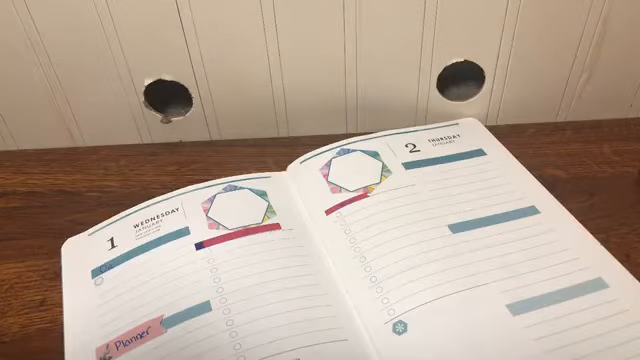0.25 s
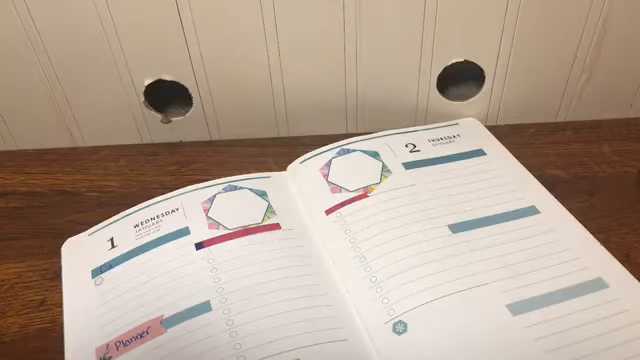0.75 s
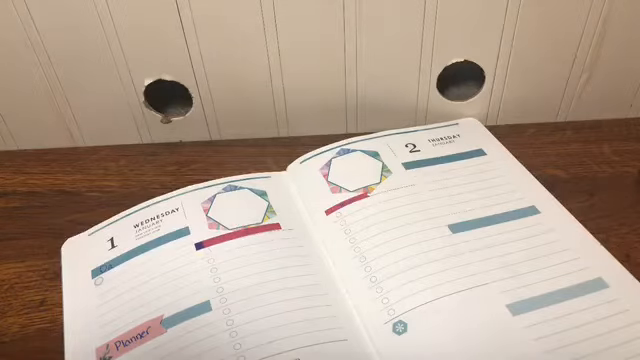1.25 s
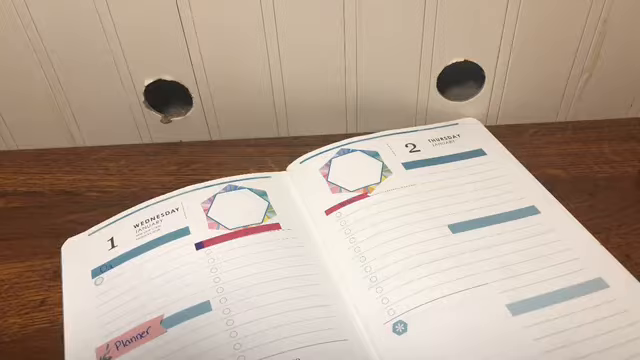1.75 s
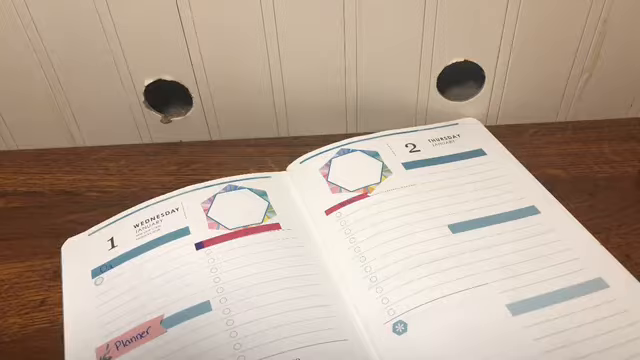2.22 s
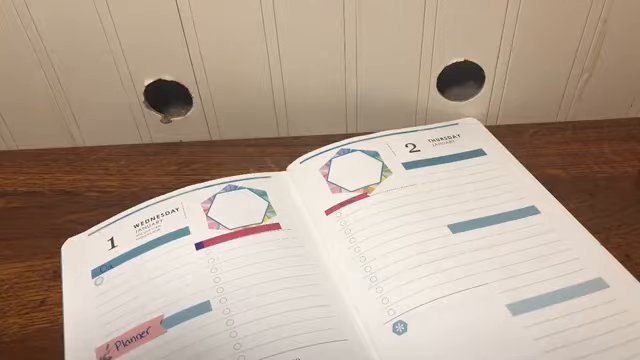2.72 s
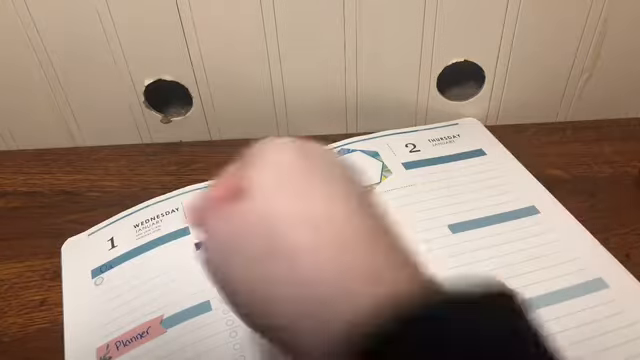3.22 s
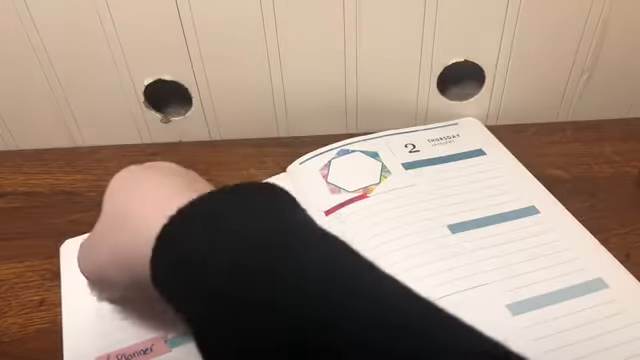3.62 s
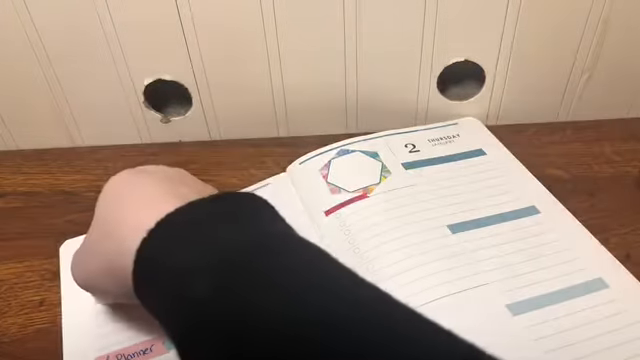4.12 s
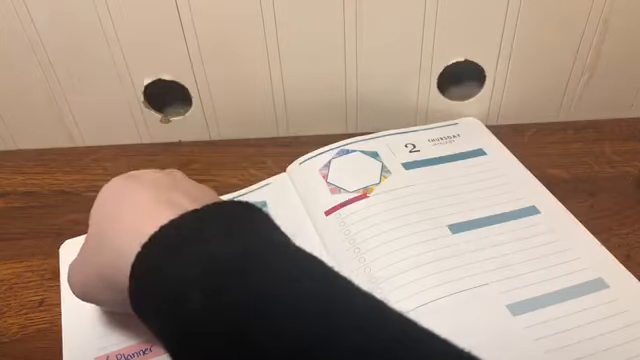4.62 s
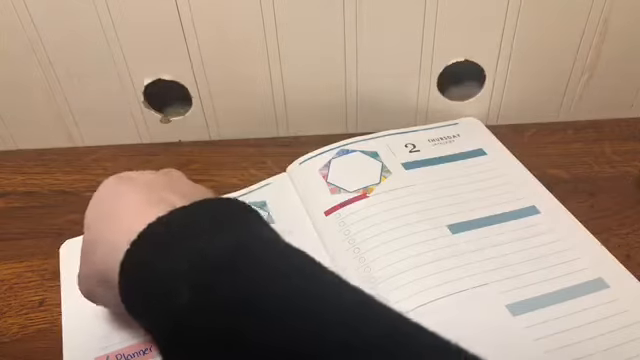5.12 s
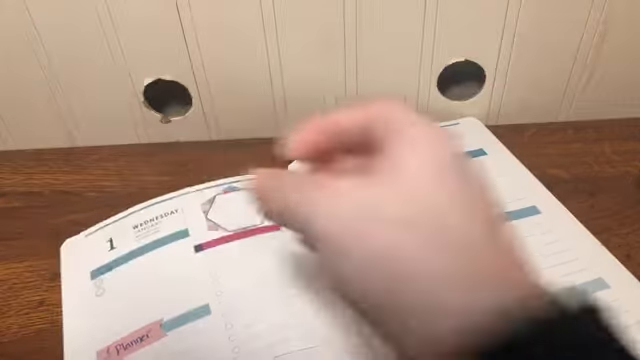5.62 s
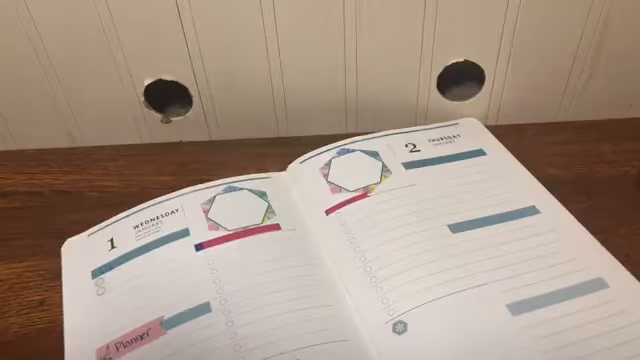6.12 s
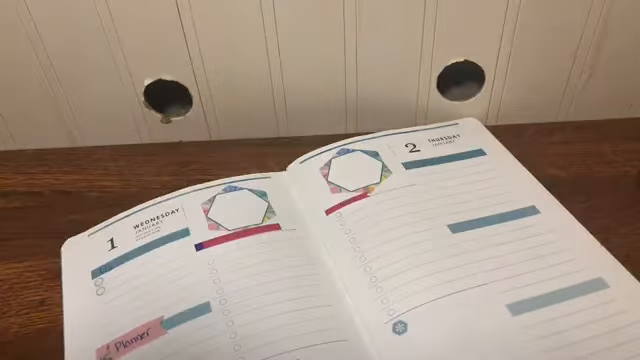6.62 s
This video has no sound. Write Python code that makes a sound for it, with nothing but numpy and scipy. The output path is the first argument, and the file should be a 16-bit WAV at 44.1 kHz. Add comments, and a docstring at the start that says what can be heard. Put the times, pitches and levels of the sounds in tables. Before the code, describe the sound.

Light nail and paper-edge ticks open over low electrical and motor hum. The stiff backing sheet pops sharply, ticks on, then pops again more softly. A soft hand lands on the book with a woody thump, smooths a sticker with a faint rub, thumps once more and drags away. Afterwards come a soft low rumble, fine rustling, faint high peeling squeaks and a crisp tap, all close and dry with a short room tail.

```python
"""A sticker is picked off its stiff backing sheet with ticks and two snaps, close up in a small humming room.
A hand bumps the wooden desk, strokes a planner page, smooths the sticker down and drags away; the next one squeaks.
Ticks, snaps and taps are noise bursts through resonances, strokes are grainy noise, bumps are decaying sines.
Under it lie a motor and steady tones made of sines, and the noise of the room air."""
import sys
import numpy as np
from scipy import signal
from scipy.fft import rfft, irfft, next_fast_len
from scipy.io import wavfile
from scipy.ndimage import uniform_filter1d, map_coordinates

SR = 44100
rng = np.random.default_rng(int(sys.argv[2]) if len(sys.argv) > 2 else 0)


def bounce(signal):
    """Save signal as a 16-bit WAV file at the path given by the first command-line argument."""
    frames = np.transpose(np.atleast_2d(signal))
    limited = np.clip(frames, -1, 1)
    pcm = np.round(limited * 32767).astype(np.int16)
    wavfile.write(sys.argv[1], SR, pcm)


N = 302526

# resonances of the bent backing sheet: f/Hz, width/Hz, relative lift/dB (scaled where used)
SHEET_MODES = [(1008, 64, 13), (1840, 75, 17), (2890, 185, -1.5), (3300, 110, -13), (4110, 330, 8.5),
               (5250, 130, 14), (5770, 210, 1), (7160, 100, 8.5), (9100, 230, 10.5)]


def amp(db):
    """Decibels to gain."""
    return 10 ** (np.asarray(db) / 20)


def unit(x):
    """Scale to rms 1."""
    return x / np.sqrt(np.mean(x ** 2) + 1e-20)


def along(points, hz):
    """Read (f/Hz, value) points on a log frequency axis."""
    f, v = np.transpose(points)
    return np.interp(np.log(hz + 1), np.log(f), v)


def wobble(rate):
    """A smooth random curve with rate knots a second."""
    knots = rng.standard_normal(int(N * rate / SR) + 4)
    return map_coordinates(knots, [np.arange(N) * rate / SR])


def filtered(x, response):
    """Filter x by a response given as a function of frequency."""
    m = next_fast_len(N + SR // 2)
    return irfft(rfft(x, m) * response(np.fft.rfftfreq(m, 1 / SR)), m)[:N]


def coloured(x, points):
    """Shape x by an EQ curve of (f/Hz, level/dB) points, then scale to rms 1."""
    return unit(filtered(x, lambda hz: amp(along(points, hz))))


def causal(curve, size=4096):
    """Minimum-phase impulse response of energy 1 for a dB curve of frequency."""
    cepstrum = irfft(np.log(amp(curve(np.fft.rfftfreq(size, 1 / SR)))))
    cepstrum[1:size // 2] *= 2
    cepstrum[size // 2 + 1:] = 0
    h = irfft(np.exp(rfft(cepstrum)))
    return h / np.linalg.norm(h)


def fade(t, t60):
    """Exponential decay that loses 60 dB in t60 seconds."""
    return np.exp(-np.log(1000) * t / max(t60, 1e-3))


def burst(t60, attack):
    """A crackle of noise that rises quickly and dies away, with the energy of its envelope."""
    t = np.arange(SR // 5) / SR
    shape = fade(t, t60) * (1 - np.exp(-t / attack))
    x = shape * rng.standard_normal(len(t))
    return x * np.linalg.norm(shape) / np.linalg.norm(x)


def add(track, s, sound):
    """Mix a sound in at time s."""
    i = max(round(s * SR), 0)
    track[i:i + len(sound)] += sound[:max(N - i, 0)]


def friction(rate, spread_db, smooth):
    """Paper fibres catch and let go: rate grains a second of uneven size over an even hiss."""
    hits = rng.random(N) < rate / SR
    grains = hits * rng.standard_normal(N) * amp(spread_db * rng.standard_normal(N))
    return unit(unit(grains) + smooth * rng.standard_normal(N))


def patchy(x, depth_db):
    """The contact patch keeps changing shape, so bands of the sound come and go."""
    z = signal.stft(x, nperseg=512)[2]
    field = rng.standard_normal(z.shape)
    for _ in range(2):
        across_bands = uniform_filter1d(field, size=4, axis=0)
        field = uniform_filter1d(across_bands, size=9, axis=1)
    return signal.istft(z * amp(depth_db * unit(field)), nperseg=512)[1][:N]


def stroke(start, length, attack=.025, release=.061, sag_db=8):
    """Pressure of one stroke (times in s): it builds, sags by sag_db a second, and lifts around its end."""
    t = np.arange(N) / SR - start
    build = np.clip(t / attack, 0, 1)
    lift = np.clip((length - t) / release + .5, 0, 1)
    return build * lift * amp(-sag_db * np.clip(t, 0, length))


def sheet_db(hz, modes):
    """The lift that the sheet's resonances give each frequency, at 0.63 of their listed size."""
    lift = sum(db / (1 + (2 * (hz - centre) / width) ** 2) for centre, width, db in modes)
    return 0.63 * lift


def hum():
    """A motor with a strong third order, mains hum with faint tones, and the air of the room."""
    # sines locked to the motor's turning: order, rms level/dB
    motor_orders = [(1, -71), (2, -64.5), (3, -52.5), (6, -83)]
    # mains hum and faint tones: f/Hz, mean rms level/dB
    faint_tones = [(120, -69.5), (171, -79), (188, -75.5), (531, -83), (565, -84.5)]
    # EQ of the room air: f/Hz, relative level/dB
    air_colour = [(20, -51), (32, -18.5), (48, 4), (62, 6.5), (85, -2), (140, 0.5), (240, -3), (300, -12),
                  (600, -14), (1000, -19.5), (2000, -25.5), (4000, -31), (9000, -36.5), (16000, -41.5)]
    motor_hz = 51.32  # mean speed
    t = np.arange(N) / SR
    turns = np.cumsum(motor_hz * (1 + .001 * wobble(2))) / SR
    load = amp(.6 * wobble(1.5))
    motor = load * sum(amp(db) * np.sin(2 * np.pi * (order * turns + rng.random()))
                       for order, db in motor_orders)
    tones = sum(amp(db + 1.3 * wobble(3.8)) * np.sin(2 * np.pi * (hz * t + rng.random()))
                for hz, db in faint_tones)
    air = amp(-59.5) * coloured(rng.standard_normal(N), air_colour)
    return np.sqrt(2) * (motor + tones) + air  # sqrt 2 turns sine peaks into rms levels


def ticks():
    """Nails and paper edges tick, soft ones with body, sharp ones with edge; the grip shifts the sheet's modes."""
    # tick moments: t/s, relative level/dB, relative body/dB, relative edge/dB
    contacts = [(.0024, -40.5, 6, -24), (0.0123, -52.5, -13, -29), (.0538, -40.5, 0, -19.5),
                (0.0733, -45.5, 11, -22), (0.0896, -46.5, 4.5, -31), (.176, -41, 2, -17.5),
                (.1854, -42.5, 14, -24), (0.203, -52, -14, -18), (0.2149, -34.5, -4.5, -21.5),
                (.297, -45.5, 1, -23), (0.3241, -48.5, 2, -24), (0.3358, -52.5, -16, -23),
                (.415, -47.5, -3, -11), (0.4325, -53, -5, -20), (1.0514, -43, 3, -22),
                (1.0697, -48, 1, -22), (1.1566, -36, -1, -6), (1.2372, -39, 2.5, -24),
                (1.2486, -49, 3, -15), (1.344, -47.5, 12, -24), (1.4416, -56, -15, -17),
                (1.4905, -36.5, -3, -70), (1.5024, -57, -9, -20), (1.649, -57, 2, -22),
                (1.6891, -50.5, -7, -48), (1.724, -56, 8, -20), (1.7524, -53, 5, -36),
                (2.339, -50, -9, -16), (2.4239, -49, -2.5, -17), (2.51, -47.5, -18, -1),
                (2.524, -38, -1, -14), (3.0505, -42.5, -5, -30), (3.072, -48, -15, -12),
                (3.3444, -40, -2.5, -15), (3.6396, -51, -25, -15.5), (3.66, -55, -15, -15),
                (4.3836, -62, -11, -1), (5.018, -49, 3, -37), (5.0853, -46.5, 5, -9),
                (5.1834, -52.5, 4, -16), (5.5758, -47, -9, -20), (5.584, -46, -7, -27),
                (5.6805, -47.5, -4, -21), (6.1788, -43.5, -1, -7), (6.191, -45.5, -1, -3),
                (6.2297, -44.5, 5, -3), (6.2966, -47.5, -0.5, -11), (6.467, -48, 4, -29),
                (6.555, -51, 11, -22), (6.636, -53.5, 4, -18), (6.688, -55, -1, -26)]
    t60_s, attack_s = .036, .0013
    out = np.zeros(N)
    for s, db, body_db, edge_db in contacts:
        bend = np.exp(0.136 * rng.standard_normal())
        colour = [(150, body_db - 15.0), (450, body_db + 7.5), (900, body_db + 8.5),
                  (1800, 0.2), (3200, -1.0),
                  (5500, 0.56 * edge_db + 0.5), (10000, edge_db - 1.5), (16000, 1.25 * edge_db - 6)]
        ring = causal(lambda hz: along(colour, hz) + sheet_db(hz * bend, SHEET_MODES))
        tick = signal.fftconvolve(burst(t60_s, attack_s), ring)
        add(out, s - .0005, amp(db - 1) * tick)
    return out


def room(x, wall_db, tail_db):
    """What the room sends back: near wall and desk almost at once, then a short tail."""
    # decay of the tail: f/Hz, t60/s
    tail_t60 = [(200, 0.39), (1000, 0.2), (4000, 0.25), (9000, 0.15), (16000, 0.063)]
    hz, t, z = signal.stft(rng.standard_normal(SR // 2), SR, nperseg=256)
    decay = np.exp(-np.log(1000) * t / along(tail_t60, hz)[:, None])
    tail = signal.istft(z * decay, SR, nperseg=256)[1]
    walls = burst(0.014, attack=0.00084)
    answer = np.zeros(N)
    add(answer, .003, amp(wall_db) * walls / np.linalg.norm(walls))
    add(answer, .008, amp(tail_db) * tail / np.linalg.norm(tail))
    return signal.fftconvolve(x, answer[:SR // 2])[:N]


def rustles(flutter_db):
    """Fingers and sleeve rub on paper: a papery body and a fine hiss follow the same strokes."""
    # strokes over sheet and page: start/s, length/s, rustle level/dB, hiss level/dB
    rubs = [(.17, .09, -73, -88), (0.304, .1, -67.5, -83), (1.147, 0.13, -58, -74),
            (1.338, .15, -60, -70.5), (1.585, 0.19, -75, -92), (2.29, 0.25, -70, -74.5),
            (2.568, 0.048, -63, -66), (3.069, 0.084, -64, -64.5), (3.335, 0.13, -57.5, -58),
            (3.458, 0.098, -64, -64), (5.176, 0.093, -67.5, -77), (5.278, 0.083, -69, -69),
            (5.357, 0.16, -66, -67), (5.53, 0.266, -69, -70.5), (6.168, 0.079, -70, -61.5),
            (6.242, .075, -79, -66.5), (6.324, 0.1, -70.5, -70), (6.429, 0.075, -59.5, -71),
            (6.512, 0.24, -69, -75)]
    # EQ of the papery body: f/Hz, relative level/dB
    body_colour = [(200, -4), (450, 6.5), (750, 10.5), (1100, 7.5), (1550, 6), (2300, 0), (3500, -14),
                   (6000, -35)]
    # EQ of the fine hiss: f/Hz, relative level/dB
    hiss_colour = [(1800, -2), (3500, 4.5), (5500, 0.5), (8000, -4), (12000, -9), (16000, -10)]
    body_gain, hiss_gain = np.zeros(N), np.zeros(N)
    for s, length, rustle_db, hiss_db in rubs:
        pressure = stroke(s, length)
        body_gain += amp(rustle_db) * pressure
        hiss_gain += amp(hiss_db) * pressure
    body = coloured(patchy(friction(650, spread_db=3, smooth=.4), depth_db=2.7), body_colour)
    hiss = coloured(patchy(friction(2200, spread_db=2, smooth=.9), depth_db=2.2), hiss_colour)
    flutter = amp(flutter_db * wobble(70))
    return (body_gain * body + hiss_gain * hiss) * flutter


def snaps():
    """The stiff sheet flips over in a few quick buckles, each ringing the resonances of its present bend."""
    # buckling steps, one list a snap: t/s, relative level/dB, t60/s
    buckles = [
        [(0.7086, -23.5, 0.018), (0.7103, -19, 0.0097), (.7125, -34.5, 0.041)],
        [(2.0463, -30, 0.012), (2.0484, -28, 0.0088), (2.0499, -29, 0.023)],
    ]
    # EQ of the crack: f/Hz, relative level/dB
    crack_colour = [(100, -18), (250, -11), (600, -9), (1100, -7.5), (1700, -12), (2300, -14.5),
                    (3000, -3.5), (4500, -11.5), (5600, -5), (6500, -11.5), (10000, -11), (12500, -19.5),
                    (16000, -17.5)]
    # the same sheet, bent further, for the second snap: f/Hz, width/Hz, relative lift/dB
    flexed_modes = [(754, 68, 12.5), (1004, 140, 13), (1500, 410, 10), (3260, 120, -3), (4150, 250, 21.5),
                    (5200, 260, 12), (5700, 190, 14), (7500, 150, 9), (9500, 150, 3), (15000, 2000, 10)]
    direct, spread = np.zeros(N), np.zeros(N)
    broad = causal(lambda hz: along(crack_colour, hz))
    for steps, modes in zip(buckles, (SHEET_MODES, flexed_modes)):
        ring = causal(lambda hz: along(crack_colour, hz) + sheet_db(hz, modes))
        for s, db, t60 in steps:
            crack = amp(db + 2.0) * burst(t60, attack=.0001)
            add(direct, s, signal.fftconvolve(crack, ring))
            add(spread, s, signal.fftconvolve(crack, broad))  # over all directions the peaks even out
    return direct + room(spread, wall_db=-21, tail_db=-18.0)


def taps():
    """Damped taps and clicks: one broad resonance that falls off steeply above."""
    # tap moments: t/s, relative level/dB, f/Hz, t60/s
    pats = [(3.052, -37, 684, 0.028), (3.055, -46, 1270, 0.019), (3.0557, -36, 382, 0.033),
            (3.389, -49.5, 470, 0.044), (5.0773, -36, 734, 0.028), (5.0778, -44, 1400, 0.015),
            (5.0856, -48, 14500, 0.022), (6.84, -41, 1940, 0.0085), (6.8418, -33.5, 1860, 0.039)]
    out = np.zeros(N)
    for s, db, pitch_hz, t60 in pats:
        shape = [(pitch_hz / 8, -22), (pitch_hz * .4, -8), (pitch_hz * .68, -9),
                 (pitch_hz * .9, 0), (pitch_hz * 1.15, 0),
                 (pitch_hz * 1.5, -12), (pitch_hz * 2.6, -25), (pitch_hz * 6, -46)]
        ring = causal(lambda hz: along(shape, hz))
        tap = signal.fftconvolve(burst(t60, attack=0.00057), ring)
        add(out, s, amp(db + 1.5) * tap)
    return out


def thumps():
    """A soft hand lands on the planner and pushes the desk top down; its modes ring on."""
    # blows: t/s, relative level/dB, upper-mode trim/dB
    blows = [(3.056, -29, -1.5), (5.0815, -32, -11.5)]
    # modes of the desk under the planner: f/Hz, relative level/dB, t60/s
    desk_modes = [(101, -17, 0.04), (148.6, 2, 0.14), (239.2, 2.5, 0.11), (360, -1.5, 0.075),
                  (403, 0, 0.065), (569, -15, 0.018), (615, -20.5, 0.1), (754, -10.5, 0.097),
                  (936, -23, 0.066), (1340, -31, 0.064)]
    out, t = np.zeros(N), np.arange(SR // 3) / SR
    soft_attack = 1 - np.exp(-t / 0.0031)
    for s, db, upper_db in blows:
        ring = np.zeros(len(t))
        for hz, level, t60 in desk_modes:
            gain = amp(level + upper_db * (hz > 200))
            ring += gain * fade(t, t60) * np.sin(2 * np.pi * hz * t)
        add(out, s, -amp(db + 2.5) * ring * soft_attack)  # minus: the first push is downward
    return out


def smoothing():
    """A fingertip smooths the sticker down in one long, faint rub, ever more lightly."""
    # EQ of the rub: f/Hz, relative level/dB
    rub_colour = [(400, -21), (800, 5), (1300, -2), (1900, 2), (2400, -6), (3300, -14.5), (8000, -26),
                  (16000, -40)]
    start_s, length_s, level_db, sag_db_per_s = 3.64, 0.57, -65, 17
    rub = coloured(friction(1400, spread_db=2, smooth=.9), rub_colour)
    pressure = stroke(start_s, length_s, attack=0.14, release=.3, sag_db=sag_db_per_s)
    return amp(level_db) * pressure * rub


def drag():
    """The heel of the hand sticks and slips, ever harder, and shakes the book; it dulls as the hand lifts."""
    # resonances of the page on the desk: f/Hz, width/Hz, relative level/dB
    book_modes = [(154, 26, -3), (242, 18, 1), (350, 18, -2.5), (416, 25, -0.5), (615, 26, -3),
                  (750, 26, 6), (1034, 89, -10), (1337, 38, -7), (1790, 78, -17), (2230, 460, -21.5),
                  (2600, 62, -25)]
    start_s, lift_s, level_db = 5.68, 5.775, -40
    attack_s, swell_db_per_s, t60_s = 0.017, 137, 0.1
    bright_db, dull_s = 2.5, 0.041  # treble gain in full contact, slope time of its loss
    t = np.arange(N) / SR
    swell = np.clip((t - start_s) / attack_s, 0, 1) * amp(swell_db_per_s * np.minimum(t - lift_s, 0))
    level = amp(level_db) * swell * fade(np.maximum(t - lift_s, 0), t60_s)
    bright = amp(bright_db) * np.clip((lift_s - t) / dull_s + .5, .1, 1)
    slips = friction(900, spread_db=2, smooth=.4)

    def book(f):
        """Sum of band-pass modes with alternating sign."""
        return sum((-1) ** k * amp(db) * 1j * f * w / (c * c - f * f + 1j * f * w)
                   for k, (c, w, db) in enumerate(book_modes))

    body = unit(filtered(slips, lambda hz: book(hz) / (1 + (hz / 4500) ** 3)))
    upper = filtered(body, lambda hz: 1 - 1 / (1 + (hz / 900) ** 4))
    return level * (body + (bright - 1) * upper)


def shuffle():
    """A soft low rumble of noise swells once the hand has left the page, then holds."""
    start_s, rise_s, level_db = 6.05, 0.39, -58
    swell = amp(level_db) * np.clip((np.arange(N) / SR - start_s) / rise_s, 0, 1)
    colour = [(20, -40), (32, -20), (44, -9), (60, -7), (110, -14), (300, -22.0), (1000, -96)]
    return swell * coloured(rng.standard_normal(N), colour)


def squeaks():
    """The glue lets go in very fast slips: a wavering whistle in a narrow fizz."""
    # squeaks of the peeling sticker: start/s, length/s, relative level/dB
    pulls = [(6.62, .085, -73.5), (6.715, 0.057, -69), (6.773, 0.12, -72)]
    # EQ of the fizz around the whistle: f/Hz, relative level/dB
    fizz_colour = [(3500, -22), (4800, -14), (5170, 0), (5550, -13), (6150, -10), (7200, -26), (12000, -36)]
    whistle_hz, waver_hz = 5130, 34.8
    pull = sum(amp(db) * stroke(s, length, attack=0.012, release=.02) for s, length, db in pulls)
    cycles = np.cumsum(whistle_hz + waver_hz * wobble(120)) / SR
    whistle = np.sqrt(2) * np.sin(2 * np.pi * cycles)
    fizz = coloured(rng.standard_normal(N), fizz_colour)
    return pull * (amp(-7 + 3 * wobble(90)) * whistle + amp(-1.5) * fizz)


def scene():
    """All the handling, in the humming room."""
    paper = ticks() + taps() + rustles(flutter_db=0.3) + smoothing() + squeaks()
    desk = thumps() + drag()
    echoes = room(paper, wall_db=-9.0, tail_db=-15.5) + room(desk, wall_db=-14, tail_db=-17.5)
    return (snaps() + paper + desk + echoes + shuffle() + hum())[None]


def record(dry):
    """The small microphone drops the deepest bass, and nothing is kept above the band limit."""
    top_hz = 16050
    thin = signal.sosfilt(signal.butter(4, 40, "highpass", fs=SR, output="sos"), dry[0])
    return filtered(thin, lambda hz: hz < top_hz)[None]


dry = scene()
out = record(dry)
bounce(out)
```